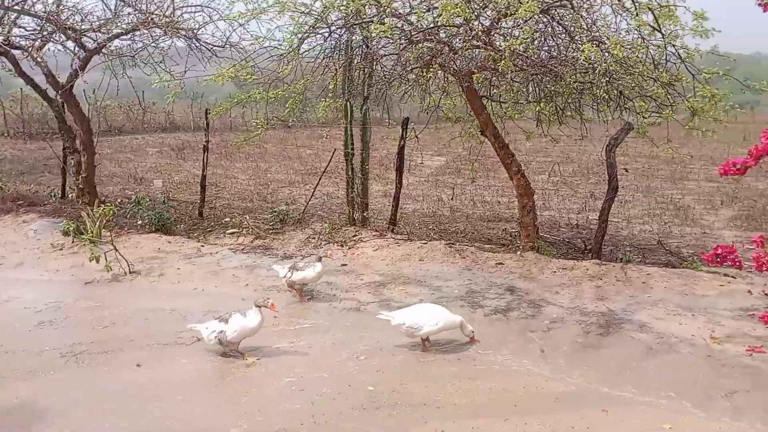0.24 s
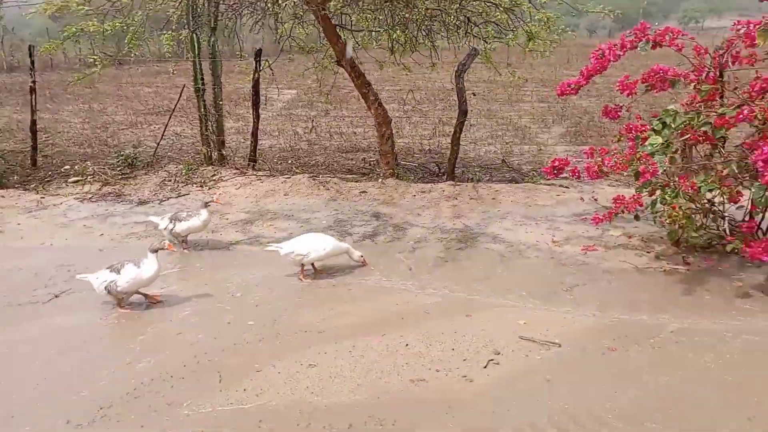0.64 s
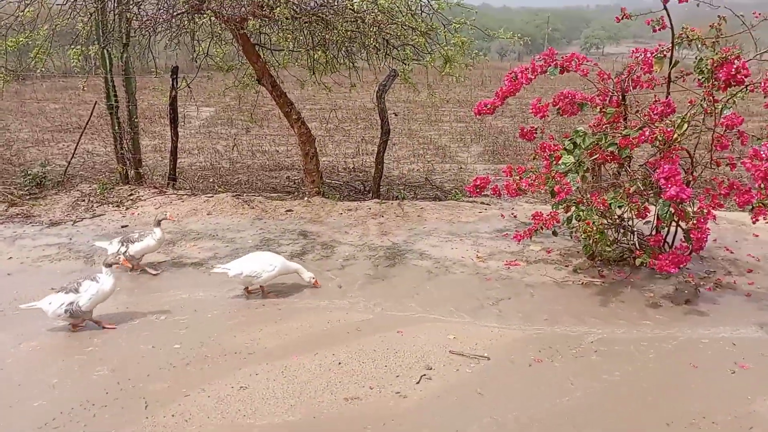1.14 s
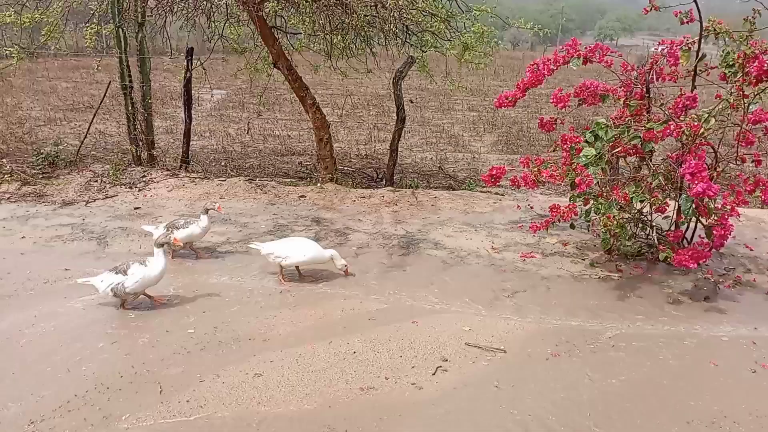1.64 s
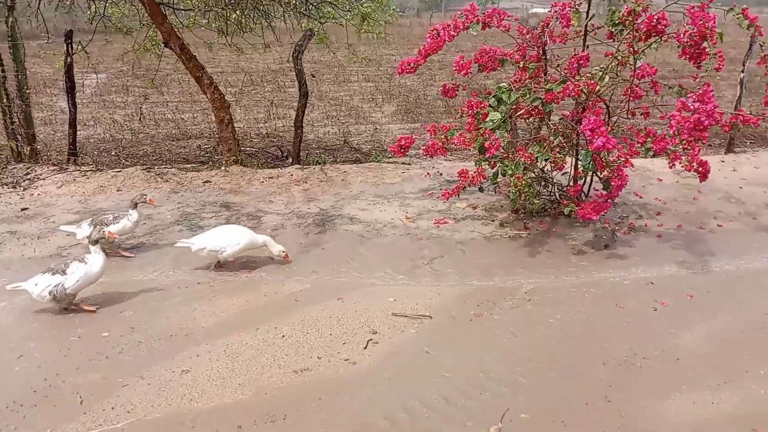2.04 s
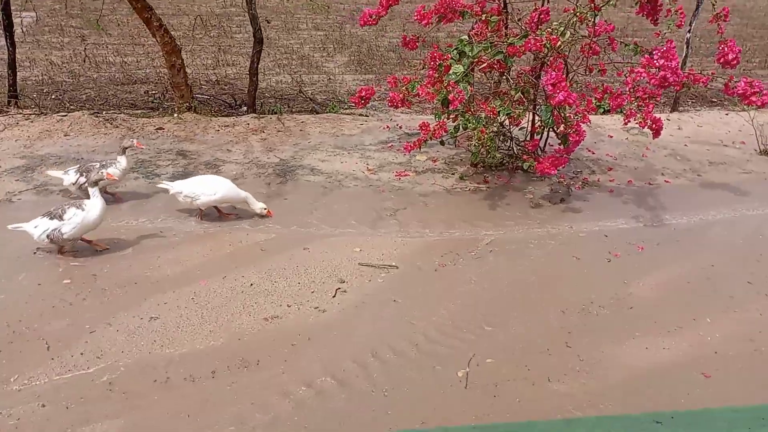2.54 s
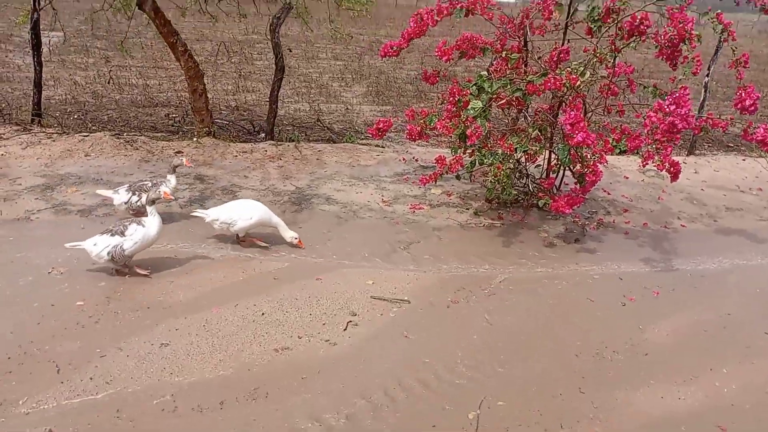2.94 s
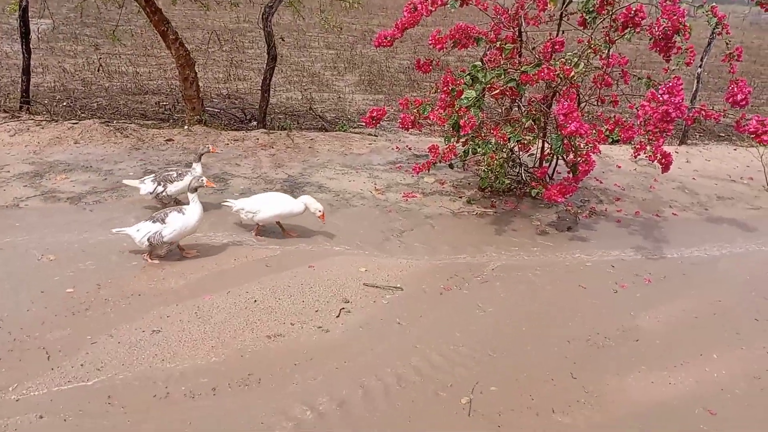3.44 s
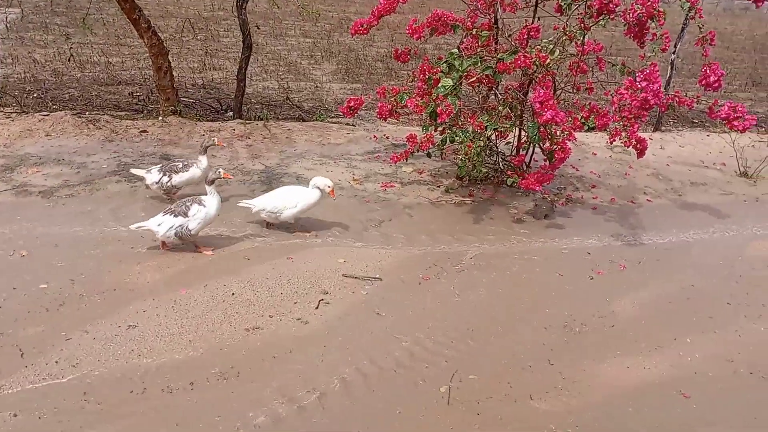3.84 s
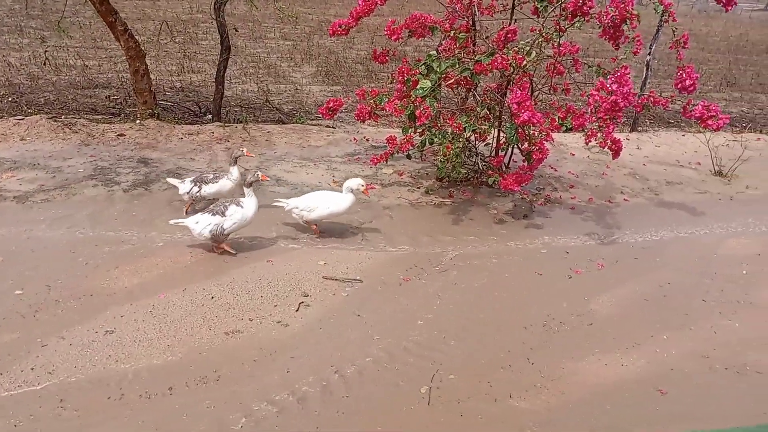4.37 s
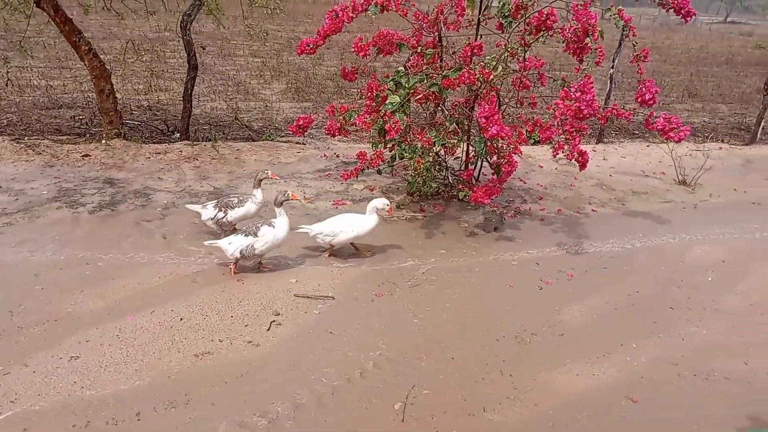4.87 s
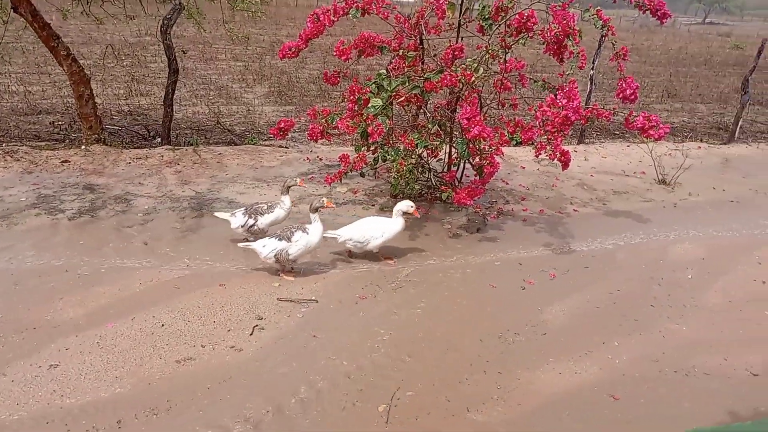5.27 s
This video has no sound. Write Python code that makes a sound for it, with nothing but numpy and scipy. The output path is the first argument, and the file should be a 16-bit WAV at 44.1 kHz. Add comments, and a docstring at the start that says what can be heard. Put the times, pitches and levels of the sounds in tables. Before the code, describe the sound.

Outdoors in a wet open yard, steady fine rain patters, stronger on the right, with sharp single splashes. A low engine, probably a motorcycle some way off, putters softly, then pulls into a louder bark around the middle, drops back and revs again to the end. A thin bird chirps briefly early on. The stereo microphone is close to the drips.

```python
"""Steady rain patters on wet ground in an open yard, mostly to the right, with louder splashes and a faint bird.
A low throb, most likely a single-cylinder motorcycle some way off, idles, pulls away, eases off and pulls again.
Rain and splashes are shaped noise bursts, the bird is gliding sines, the outdoor rumble is coloured noise.
The engine is a train of firing impulses ringing in exhaust bands, plus a hum, gas noise, echoes and a tail."""
import sys
import numpy as np
from scipy import signal
from scipy.fft import rfft, irfft
from scipy.io import wavfile
from scipy.ndimage import uniform_filter1d

SR = 44100
rng = np.random.default_rng(int(sys.argv[2]) if len(sys.argv) > 2 else 0)


def wrap_up_sound(samples):
    """Save the sound to the file named by the first command line argument, as 16-bit audio."""
    columns = np.atleast_2d(samples).T
    # keep every value between -1 and 1, then stretch to whole-number steps
    tamed = np.clip(columns, -1, 1)
    steps = np.round(tamed * 32767).astype(np.int16)
    wavfile.write(sys.argv[1], SR, steps)


N = 242991
TIME = np.arange(N) / SR


def from_db(db):
    """Decibels to gain."""
    return 10 ** (np.asarray(db) / 20)


def rms_one(x):
    """Scale to rms 1."""
    return x / np.sqrt(np.mean(x ** 2) + 1e-20)


def in_time(rows):
    """Each column of a curve at every sample."""
    time_s, *columns = np.transpose(rows)
    return [np.interp(TIME, time_s, column) for column in columns]


def band(x, low_hz, high_hz, order=2):
    """Causal band-pass."""
    high_hz = min(high_hz, SR * 0.45)
    low_hz = min(low_hz, high_hz - 10)
    sos = signal.butter(order, [low_hz, high_hz], "band", fs=SR, output="sos")
    return signal.sosfilt(sos, x + 1e-18)


def coloured(x, spectrum):
    """Filter by a smooth spectrum, one level column per channel."""
    hz, *columns = np.transpose(spectrum)
    log_hz = np.log(np.fft.rfftfreq(N, 1 / SR) + 1)
    level_db = [np.interp(log_hz, np.log(hz), column) for column in columns]
    return irfft(rfft(x) * from_db(level_db), N)


def drift(rate_hz):
    """Slow random curve of rms 1: two-pole low-passed noise, computed every 40 samples."""
    step = 40
    pole = np.exp(-2 * np.pi * rate_hz * step / SR)
    noise = rng.standard_normal(N // step + 2002)
    slow = signal.lfilter([1], [1, -2 * pole, pole ** 2], noise)[2000:]  # drop the filter's start-up
    return np.interp(np.arange(N) / step, np.arange(len(slow)), rms_one(slow))


def clicks(times_s, sizes):
    """Impulses at the given times."""
    inside = (times_s >= 0) & (times_s < (N - 1) / SR)
    return np.bincount((times_s[inside] * SR).astype(int), sizes[inside], N)


def delayed(x, delay_s):
    """The same sound, later."""
    return np.interp(TIME - delay_s, TIME, x, left=0)


def panned(x, left_over_right_db):
    """Share a sound between left and right."""
    return x * from_db([[left_over_right_db / 2], [-left_over_right_db / 2]])


# distant outdoor rumble, relative spectrum: (frequency [Hz], level [dB per Hz])
RUMBLE_SPECTRUM = [(20, -29), (38, -10), (58, 6), (110, 10.5), (200, -0.5), (370, 2.5), (520, -7),
                   (900, -15), (3000, -42)]
RUMBLE_DB = -46.5


def rumble(side_db=-7):
    """Low outdoor background: coloured noise, nearly alike at both ears."""
    mid, side = rng.standard_normal((2, N))
    stereo = mid + from_db(side_db) * side * np.array([[1], [-1]])
    return from_db(RUMBLE_DB) * rms_one(coloured(stereo, RUMBLE_SPECTRUM))


# bird: (time [s], length [s], start pitch [Hz], end pitch [Hz], level [dB])
BIRD_CHIRPS = [(1.348, .045, 5300, 5400, -51), (1.396, 0.08, 5750, 5360, -45.5),
               (1.461, 0.06, 5500, 5630, -51), (1.54, 0.062, 5550, 5670, -43),
               (1.65, 0.083, 5760, 5670, -50), (1.747, 0.1, 5870, 5840, -53),
               (1.977, 0.054, 5850, 5800, -50)]


def bird(waver_hz=130, flutter_db=3):
    """Thin chirps from the right: gliding sines with wavering pitch and fluttering level."""
    out = np.zeros(N)
    waver = waver_hz * drift(160)
    for start_s, length_s, start_hz, end_hz, db in BIRD_CHIRPS:
        along = np.clip((TIME - start_s) / length_s, 0, 1)
        hz = start_hz + (end_hz - start_hz) * along + waver
        tone = np.sin(2 * np.pi * np.cumsum(hz) / SR)
        out += from_db(db) * np.sin(np.pi * along) * tone
    flutter = from_db(flutter_db * drift(90) - 2.5)
    return panned(out * flutter, left_over_right_db=-21.0)


def drops(per_s, spread_db, ring_s):
    """Drops land at random, each a tiny decaying noise burst of its own size and side."""
    landed = rng.random(N) < per_s * from_db(3 * drift(7)) / SR
    size = landed * from_db(spread_db * np.minimum(rng.exponential(1, N), 4))
    sides = size * from_db(3.3 * rng.standard_normal((2, N)))
    energy = signal.lfilter([1], [1, -np.exp(-2 / (ring_s * SR))], sides ** 2 + 1e-18)
    return rms_one(np.sqrt(energy) * rng.standard_normal((2, N)))


# rain, relative spectrum: (frequency [Hz], left level [dB per Hz], right level [dB per Hz])
RAIN_SPECTRUM = [(300, -32, -11), (704, -11, -8.5), (1020, -9, -6), (1480, -11, -5.5), (2560, -10, -2),
                 (3970, -11, -2.5), (5450, -11.5, 0.6), (6340, -10.5, -0.5), (8700, -5.5, 0.3),
                 (10080, -1.5, -3), (11340, -8, -8.5), (13600, -10.5, -9.5), (15700, -13.5, -12.5)]
# fine spray on top of the rain: (time [s], level [dB])
SPRAY_LEVEL = [(0, -49.5), (.43, -45), (1.55, -50), (2.4, -54.5), (3.3, -71), (4.3, -51), (5.5, -51.5)]
PATTER_DB = -43.5


def rain(wash_db=0.0, ticks_db=-5, plips_db=-5, flicker_db=1.3):
    """Far drops merge to a wash, near ones tick or plip in narrower bands; fine spray comes and goes."""
    spray_db, = in_time(SPRAY_LEVEL)
    wash = rng.standard_normal((2, N)) * from_db(flicker_db * drift(12.0))
    ticks = band(drops(per_s=1100, spread_db=5.5, ring_s=0.0014), 2600, 20500, order=1)
    edges_hz = np.geomspace(1300, 12000, num=11)
    plips = sum(band(drops(per_s=51, spread_db=4.0, ring_s=0.031), low_hz, high_hz)  # drops per band
                for low_hz, high_hz in zip(edges_hz, edges_hz[1:]))
    layers = [(wash_db, wash), (ticks_db, ticks), (plips_db, plips)]
    patter = sum(from_db(db) * rms_one(coloured(x, RAIN_SPECTRUM)) for db, x in layers)
    spray = rms_one(band(drops(per_s=2100, spread_db=5.5, ring_s=0.0046), 6900, 11000))
    return from_db(PATTER_DB) * patter + panned(from_db(spray_db) * spray, left_over_right_db=-8.5)


# centres of the random values
SMALL_PER_S, SMALL_DB, SMALL_HZ, SMALL_T60_S = 3.4, -48.5, 9200, 0.07


def small_splashes():
    """Smaller splashes at random: rows of (time [s], level [dB], pitch [Hz], t60 [s])."""
    chance = rng.random((int(SMALL_PER_S * N / SR), 4))
    return [(when * (N / SR - 0.05),
             SMALL_DB + 6 * (size - 0.5),
             SMALL_HZ * 2 ** (pitch - 0.5),
             SMALL_T60_S * (length + 0.5))
            for when, size, pitch, length in chance]


# near splashes: (time [s], level [dB], pitch [Hz], t60 [s])
NEAR_SPLASHES = [(0.39, -38, 7400, 0.21), (.86, -41, 10100, 0.1), (.916, -44, 5000, 0.28),
                 (1.134, -43, 11000, 0.049), (1.292, -40.5, 7940, .19), (1.557, -43, 7150, 0.34),
                 (1.864, -38, 5760, 0.13), (2.247, -37.5, 8060, 0.089), (2.429, -38.5, 10580, .03),
                 (2.653, -39, 5600, 0.22), (2.792, -39, 5530, .063), (2.832, -40.5, 6250, 0.14),
                 (3.005, -46.5, 3160, 0.3), (3.101, -39.5, 5500, .32), (3.241, -38.5, 7330, .12),
                 (3.27, -30, 7800, 0.02), (3.276, -33.5, 6900, 0.16), (3.674, -41, 3562, 0.037),
                 (3.753, -43, 6070, .38), (3.888, -35, 8860, 0.12), (4.002, -37, 5400, 0.08),
                 (4.328, -47, 2000, 0.52), (4.765, -39, 8670, 0.078), (5.151, -40, 5110, 0.29),
                 (5.366, -40, 3765, 0.15), (5.404, -46, 1900, 0.31)]
SPLASH_WIDTH_HZ = 3300


def splashes(slap_db=3, slap_s=0.00051, tail_db=-3):
    """A big drop slaps, then its droplets fall back in a dying, grainy spray."""
    out = np.zeros((2, N))
    for start_s, db, hz, t60_s in [*NEAR_SPLASHES, *small_splashes()]:
        start = int(start_s * SR)
        age_s = TIME[:min(SR // 4, N - start)]
        droplets = rms_one(uniform_filter1d(rng.standard_normal(len(age_s)), size=130))
        grain = rms_one(from_db(4 * np.tanh(droplets)))
        slap = from_db(slap_db) * np.exp(-age_s / slap_s)
        tail = from_db(tail_db - 60 * age_s / t60_s) * grain
        # band edges whose geometric mean is the pitch
        low_hz = np.hypot(hz, SPLASH_WIDTH_HZ / 2) - SPLASH_WIDTH_HZ / 2
        hiss = band(rng.standard_normal((2, len(age_s))), low_hz, low_hz + SPLASH_WIDTH_HZ)
        out[:, start:start + len(age_s)] += from_db(db) * (slap + tail) * rms_one(hiss)
    return panned(out, left_over_right_db=-17.5)


THROTTLE_S = 0.084  # time to open or close


def gate(start_s, end_s):
    """1 while the throttle is open, 0 while it is shut."""
    return np.clip(np.minimum(TIME - start_s, end_s - TIME) / THROTTLE_S + 0.5, 0, 1)


# throttle held open: (start [s], end [s], boom lost [dB], extra drone [dB], extra overtone [dB],
# extra rasp [dB], random blur of the pulse times [s])
THROTTLE_PULLS = [(2.306, 2.483, 10.5, -3, 0, -1, 0.00034), (2.528, 3.768, 12, -2, 0, -1.5, 0.00017),
                  (4.32, 4.53, 24, 0.5, 2, 1, 0.00043), (4.62, 5.6, 21, 3.5, -1, 6.5, 0.00079)]
IDLE_BLUR_S = 0.00012


def throttle():
    """Curves of boom lost, extra drone, overtone and rasp [dB], and random blur of the pulse times [s]."""
    shut = np.array([0, 0, 0, 0, IDLE_BLUR_S])
    opened = sum(np.outer(pull - shut, gate(start_s, end_s)) for start_s, end_s, *pull in THROTTLE_PULLS)
    return shut[:, None] + opened


# engine speed: (time [s], speed [rpm])
ENGINE_SPEED = [(0, 2508), (1.02, 2405), (1.37, 1928), (1.44, 3112), (2.27, 3036), (2.43, 3303),
                (2.64, 3056), (2.98, 3332), (3.31, 3475), (3.62, 3965), (3.73, 3582), (3.84, 3539),
                (4.24, 2763), (4.45, 3277), (4.56, 2580), (4.69, 3217), (5.11, 3101), (5.5, 3282)]


def firings(blur_s, start_cycle=0.2498):
    """A four-stroke single fires once in two turns: blurred pulse times [s], and firings per second."""
    per_s = in_time(ENGINE_SPEED)[0] / 120
    cycles = np.cumsum(per_s) / SR + start_cycle
    times_s = TIME[1:][np.diff(np.floor(cycles)) > 0]
    blur = np.interp(times_s, TIME, blur_s) * rng.standard_normal(len(times_s))
    return times_s + blur, per_s


# engine load, as the level of the pipe's bark: (time [s], level [dB])
ENGINE_LOAD = [(0, -49), (1.42, -57), (1.52, -43), (2.27, -44.5), (2.33, -37.5), (2.85, -31.5),
               (3.24, -30.5), (3.42, -23), (3.58, -24.5), (3.82, -32), (4.12, -34.5), (4.21, -39.5),
               (4.45, -27), (4.56, -34), (4.69, -27), (5.5, -27.5)]
# weak firings at idle: (time [s], level lost [dB])
WEAK_FIRINGS = [(.62, 19.5), (1.23, 21)]
MISFIRE_S = 0.019
BOOM_DB, BOOM_DB_PER_RPM = -36.5, 0.005  # at 3000 rpm, and rise with speed
# levels at the cruising load, and share of the load's swing followed
CRUISE_DB = -31
OVERTONE_DB, OVERTONE_FOLLOWS = -42, 0.94
RASP_DB, RASP_FOLLOWS = -57, 1
GAS_DB, GAS_FOLLOWS = -60.5, 1.0


def exhaust_levels():
    """Boom grows with speed; bark, overtone, rasp and gas grow with load; a misfire weakens all."""
    rpm, = in_time(ENGINE_SPEED)
    load_db, = in_time(ENGINE_LOAD)
    lost_db = sum(db * np.exp(-((TIME - s) / MISFIRE_S) ** 2) for s, db in WEAK_FIRINGS)
    swing_db = load_db - CRUISE_DB
    boom_db = BOOM_DB + BOOM_DB_PER_RPM * (rpm - 3000)
    overtone_db = OVERTONE_DB + OVERTONE_FOLLOWS * swing_db
    rasp_db = RASP_DB + RASP_FOLLOWS * swing_db
    gas_db = GAS_DB + GAS_FOLLOWS * swing_db
    return np.array([boom_db, load_db, overtone_db, rasp_db, gas_db]) - lost_db


# pipe note, following the heat of the gas: (time [s], pitch [Hz])
PIPE_PITCH = [(0, 173), (2.2, 195.6), (2.4, 225), (3.1, 209.2), (3.75, 198.3), (4.2, 186.4), (5.5, 179.6)]


def exhaust_band(fired, level_db, trips, low_hz, high_hz, lag_s, uneven_db, order):
    """Each firing puffs down the pipe, returns after each round trip, rings in one silencer band."""
    times_s, per_s = fired
    note_hz = np.interp(times_s, TIME, in_time(PIPE_PITCH)[0])
    chance = rng.standard_normal((len(times_s), len(trips) + 1))
    size_db = np.interp(times_s + lag_s, TIME, level_db) + uneven_db * chance[:, -1]
    size = from_db(size_db) / np.sqrt(np.interp(times_s, TIME, per_s))
    puffs = np.zeros(N)
    for k, (trip, db) in enumerate(trips):
        trip_size = size * from_db(db + uneven_db * chance[:, k])
        puffs += clicks(times_s + lag_s + trip / note_hz, trip_size)
    ringing = rms_one(band(puffs, low_hz, high_hz, order=order))
    return ringing * np.sqrt(np.sum(size ** 2) * SR / N)


# puff returns in the pipe: (round trips [count], level [dB])
PUFF_TRIPS = [(0, 4), (1, 3), (1.999, -9)]
# echoes off ground and walls: (delay [s], level [dB])
YARD_ECHOES = [(0.0117, -18.5), (0.0163, -21), (0.0213, -19), (.052, -35)]
# engine at the two ears: (frequency [Hz], left level [dB], right level [dB])
ENGINE_EARS = [(86, -3.5, -4), (215, -1, -0.44), (400, -5.5, -5.5), (800, -2.5, 2)]


def motorcycle(scatter_db=-18):
    """Off the throttle the silencer's boom leads; under load the pipe barks and gas rasps in each puff."""
    boom_lost_db, more_drone_db, more_overtone_db, more_rasp_db, blur_s = throttle()
    fired = firings(blur_s)
    boom_db, bark_db, overtone_db, rasp_db, gas_db = exhaust_levels()
    rasp_db = rasp_db + more_rasp_db
    first_puff = PUFF_TRIPS[:1]
    boom = exhaust_band(fired, boom_db - boom_lost_db, first_puff, low_hz=69.3, high_hz=108.3,
                        lag_s=-0.0065, uneven_db=1.2, order=3)
    drone = exhaust_band(fired, bark_db + more_drone_db - 13.0, first_puff, low_hz=119, high_hz=157.0,
                         lag_s=0.0043, uneven_db=2.5, order=3)
    bark = exhaust_band(fired, bark_db, PUFF_TRIPS, low_hz=186.3, high_hz=290.4,
                        lag_s=-0.00045, uneven_db=1.02, order=2)
    overtone = exhaust_band(fired, overtone_db + more_overtone_db, PUFF_TRIPS, low_hz=316.5, high_hz=422.0,
                            lag_s=-0.0019, uneven_db=2.8, order=3)
    low_rasp = exhaust_band(fired, rasp_db, first_puff, low_hz=489, high_hz=538.6,
                            lag_s=-0.00299, uneven_db=1.7, order=3)
    high_rasp = exhaust_band(fired, rasp_db - 9.5, first_puff, low_hz=663, high_hz=710,
                             lag_s=-0.0011, uneven_db=-0.1, order=3)
    # hum at twice the firing rate, following the load
    hum = from_db(bark_db - 27) * np.sin(4 * np.pi * np.cumsum(fired[1]) / SR)
    # the silencer takes the edge and the deepest part off the bark
    muffled_bark = band(bark, 58, 452)
    direct = boom + drone - muffled_bark - overtone + low_rasp + high_rasp + hum
    # escaping gas rushes on through the gaps between puffs
    gas = from_db(gas_db) * rms_one(band(rng.standard_normal((2, N)), 580, 1180, order=1))
    echoed = direct + sum(from_db(db) * delayed(direct, delay_s) for delay_s, db in YARD_ECHOES)
    ears = coloured(np.array([echoed, delayed(echoed, 0.00023)]), ENGINE_EARS)
    # trees and fences scatter a short tail (t60 0.29 s), different at each ear
    tail = rng.standard_normal((2, SR // 2)) * from_db(-60 * TIME[:SR // 2] / 0.29)
    tail /= np.sqrt(np.sum(tail ** 2, axis=1, keepdims=True))
    scattered = from_db(scatter_db) * signal.fftconvolve(direct[None], tail, axes=1)[:, :N]
    return ears + scattered + gas


def scene():
    """Rumble, bird, rain, splashes and engine in the open air."""
    return rumble() + bird() + rain() + splashes() + motorcycle()


CUTOFF_HZ = 15900


def record(dry):
    """Cut the top steeply: elliptic low-pass."""
    return signal.sosfilt(signal.ellip(12, 0.1, 90, CUTOFF_HZ, fs=SR, output="sos"), dry)


dry = scene()
out = record(dry)
wrap_up_sound(out)
```